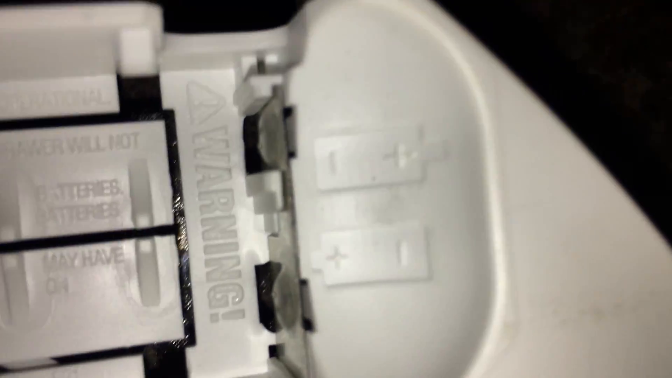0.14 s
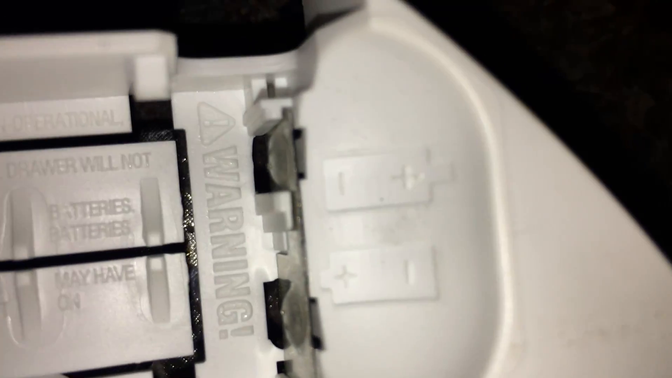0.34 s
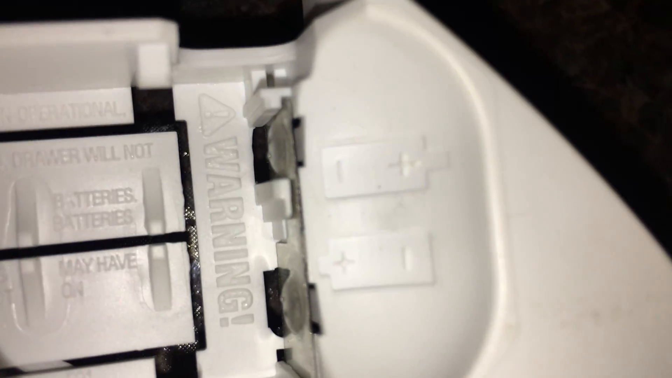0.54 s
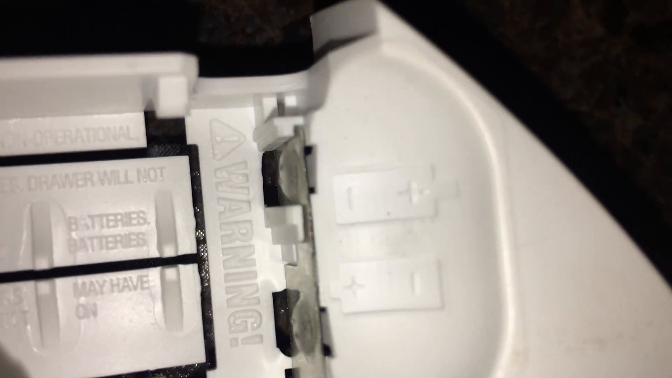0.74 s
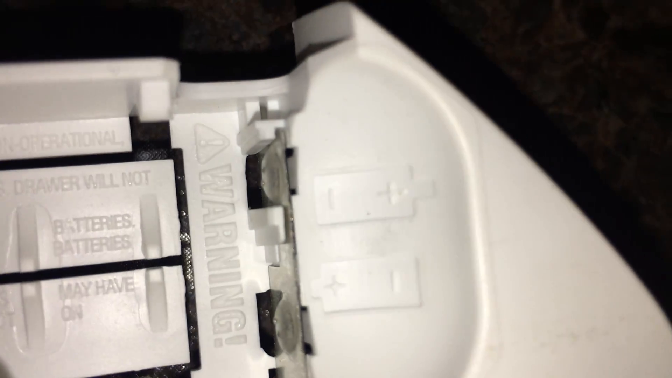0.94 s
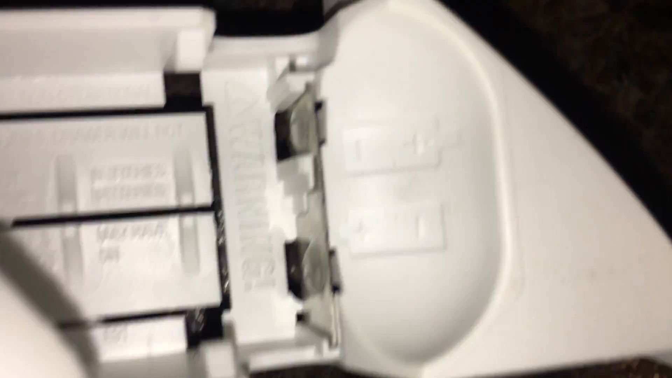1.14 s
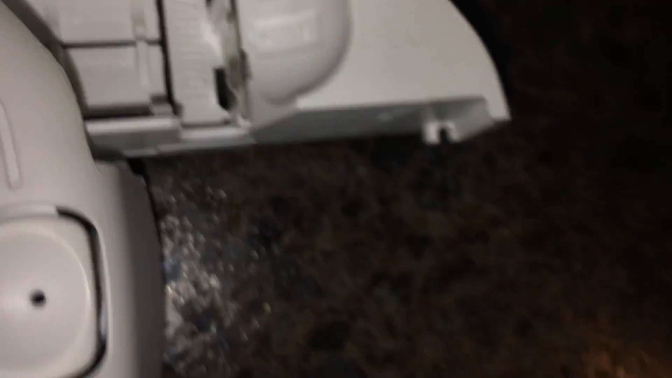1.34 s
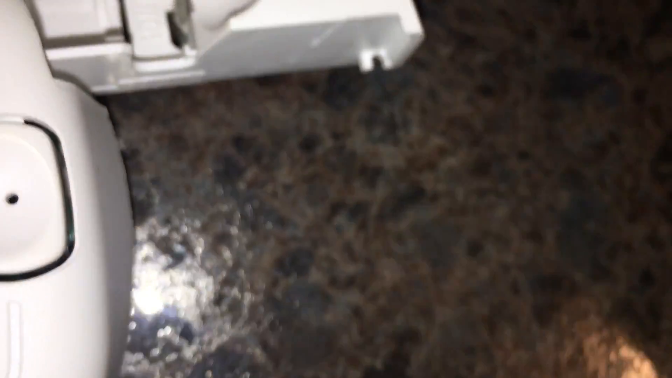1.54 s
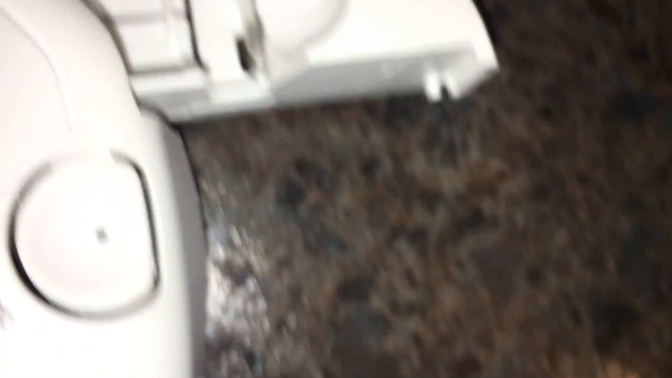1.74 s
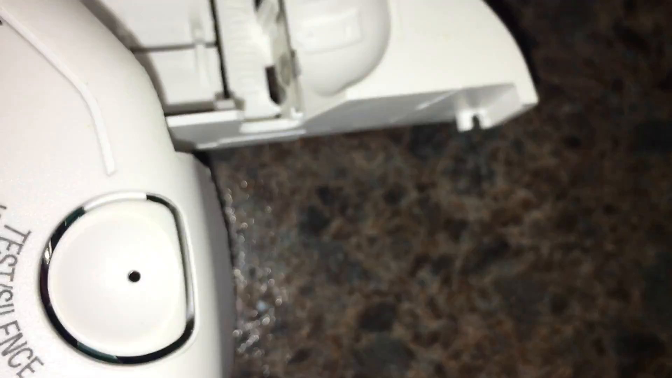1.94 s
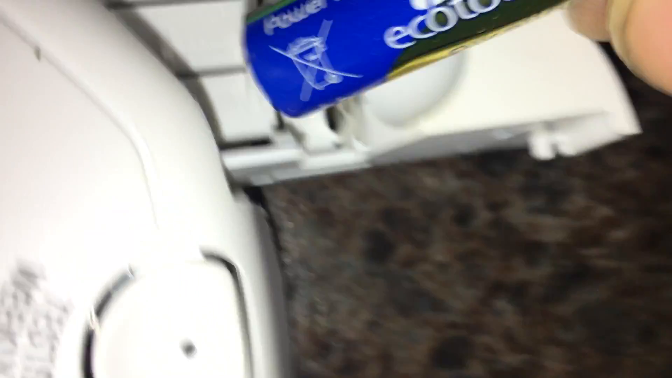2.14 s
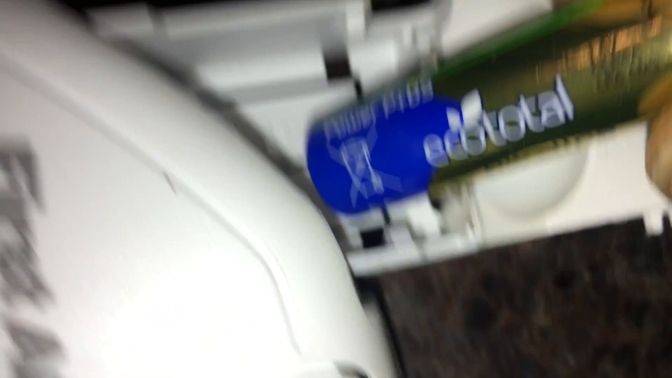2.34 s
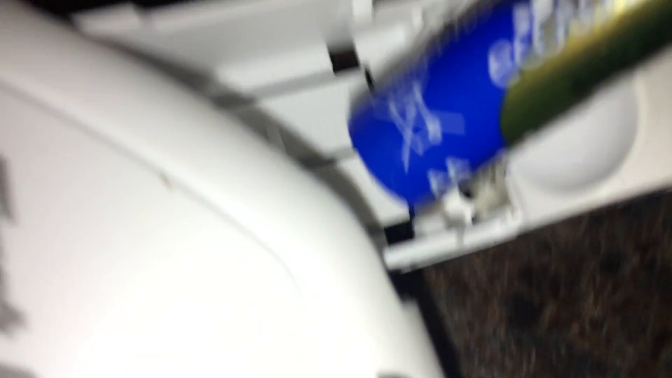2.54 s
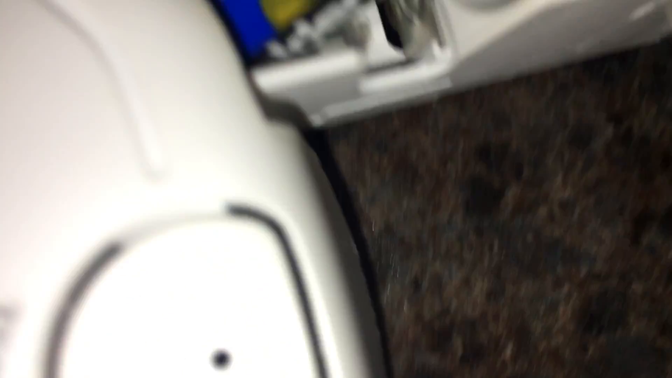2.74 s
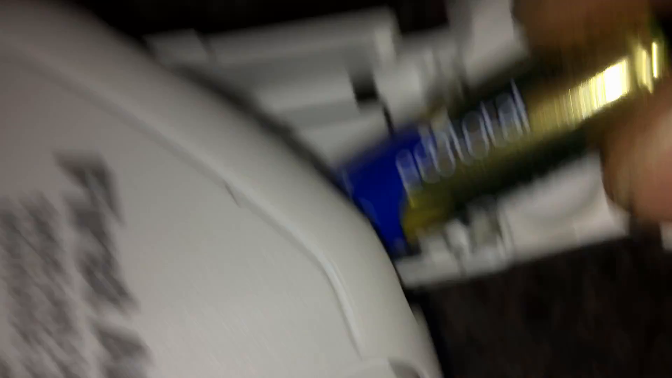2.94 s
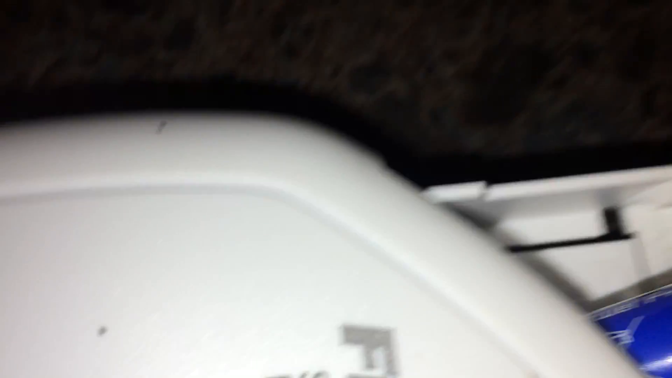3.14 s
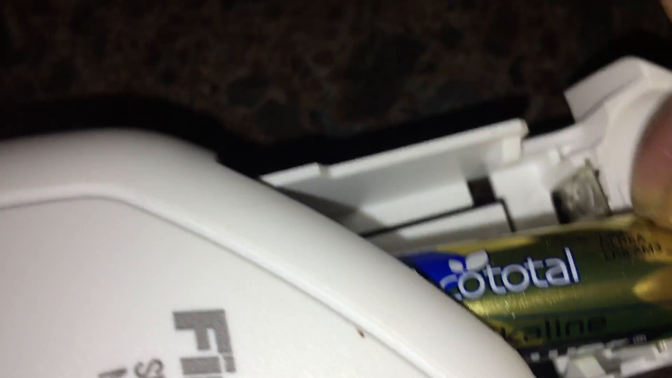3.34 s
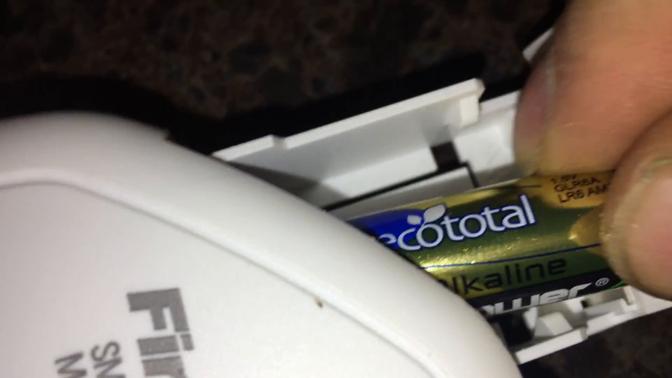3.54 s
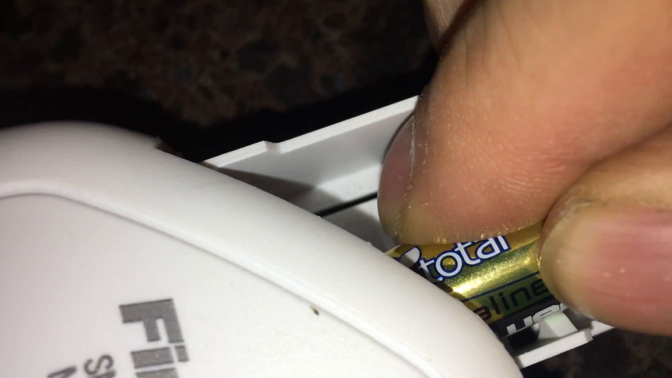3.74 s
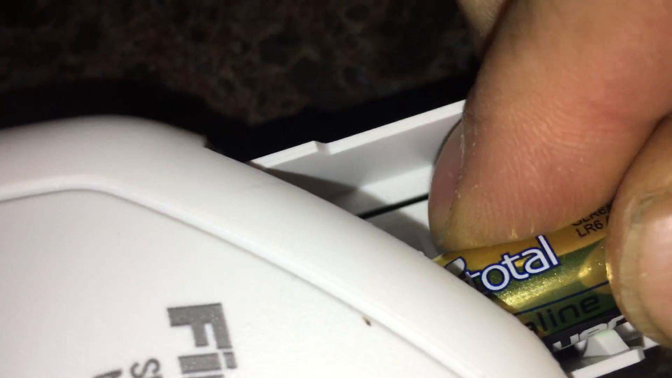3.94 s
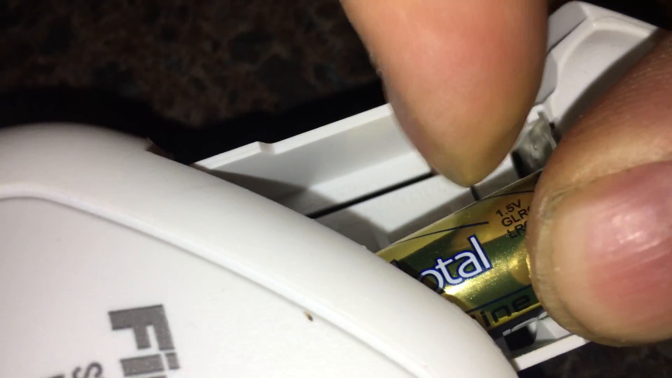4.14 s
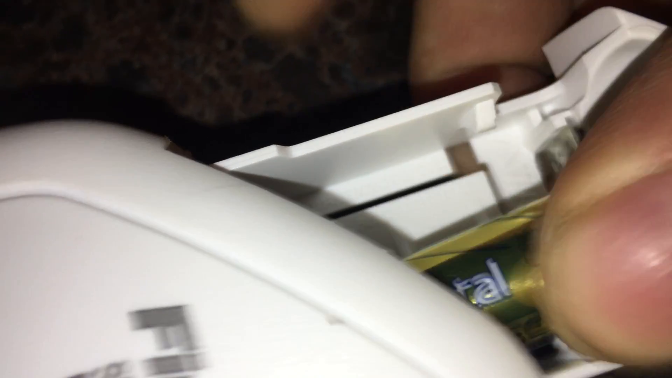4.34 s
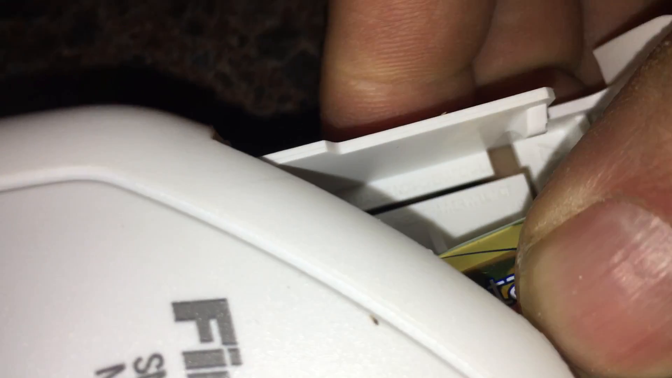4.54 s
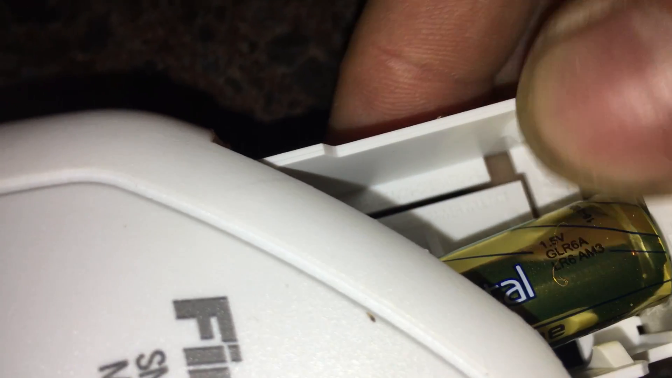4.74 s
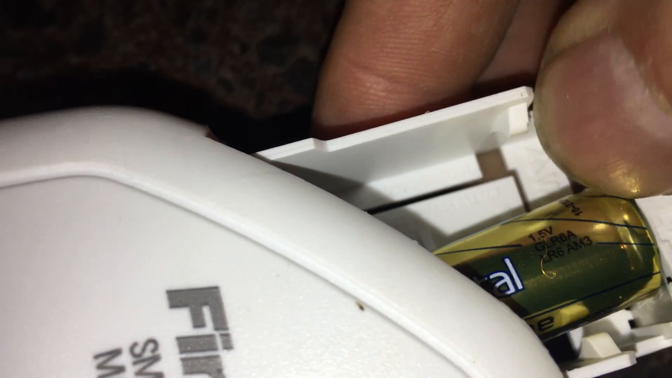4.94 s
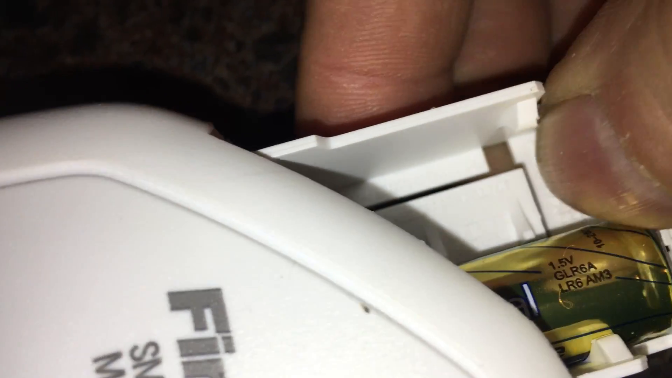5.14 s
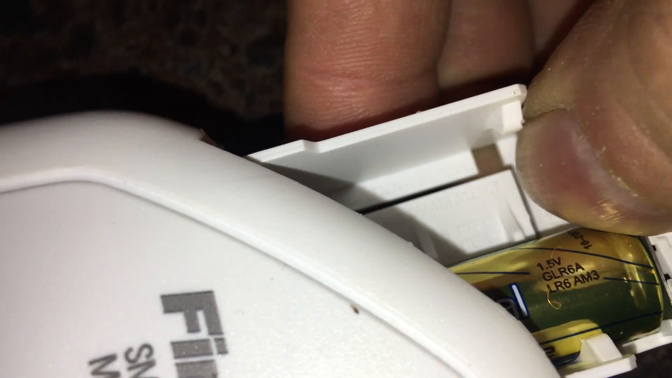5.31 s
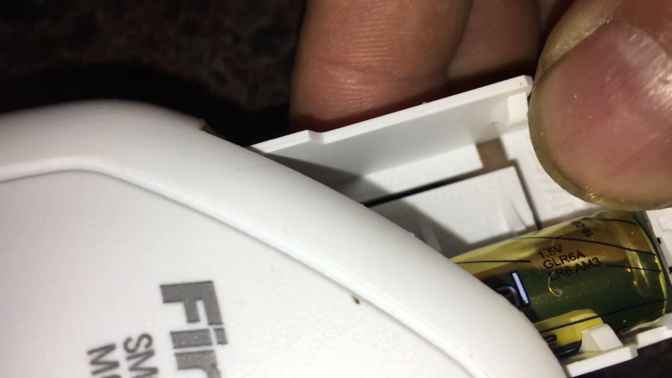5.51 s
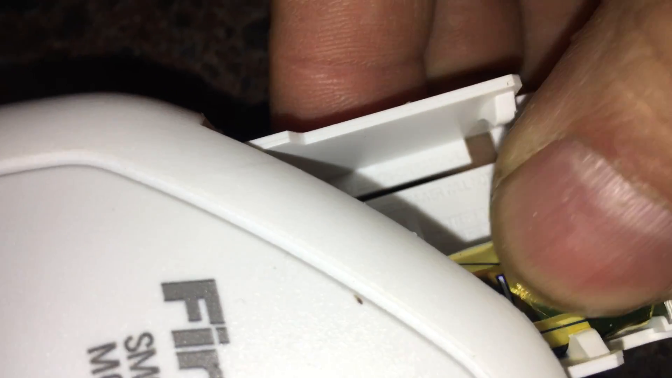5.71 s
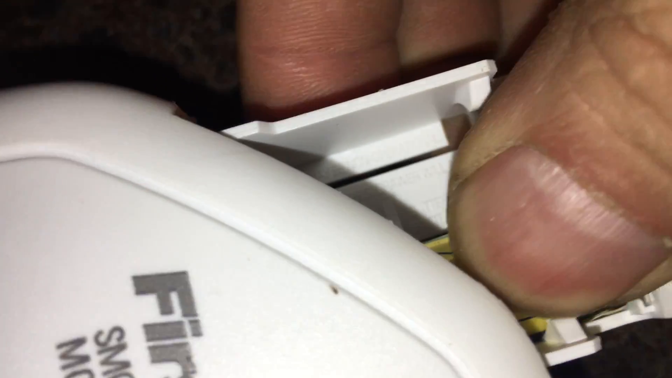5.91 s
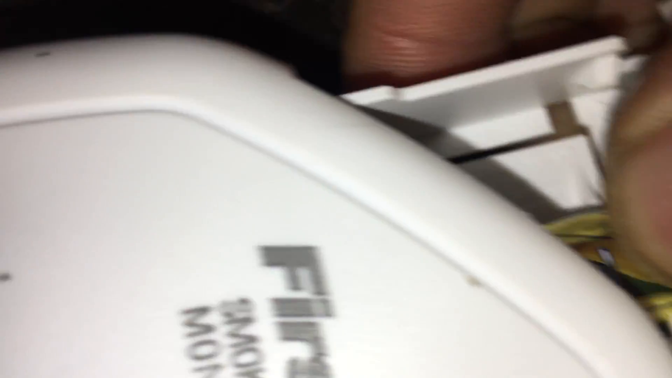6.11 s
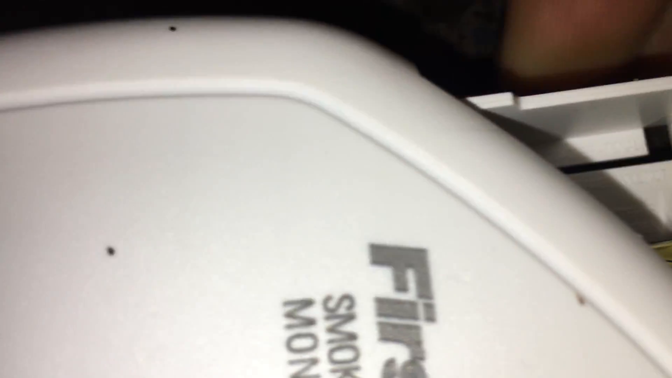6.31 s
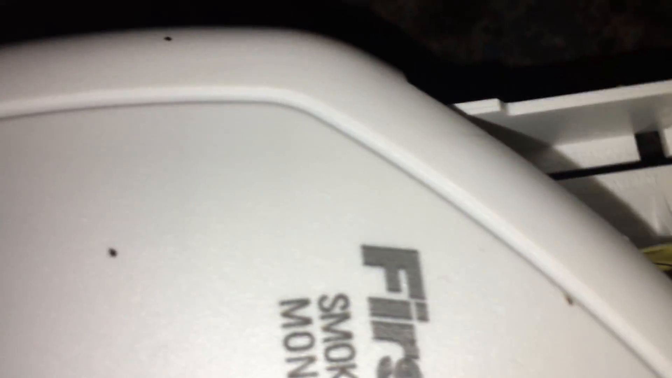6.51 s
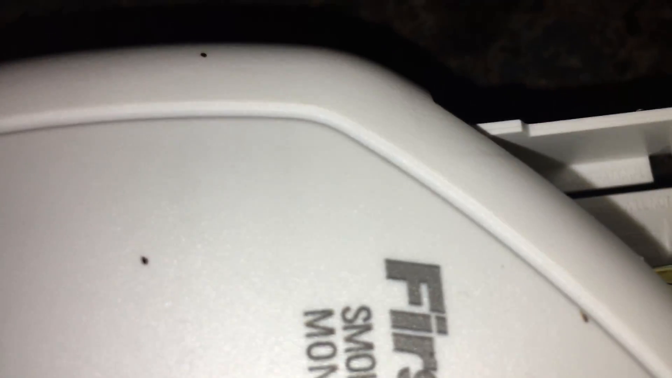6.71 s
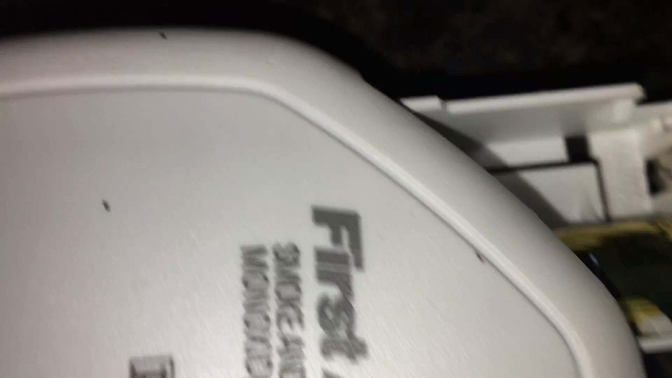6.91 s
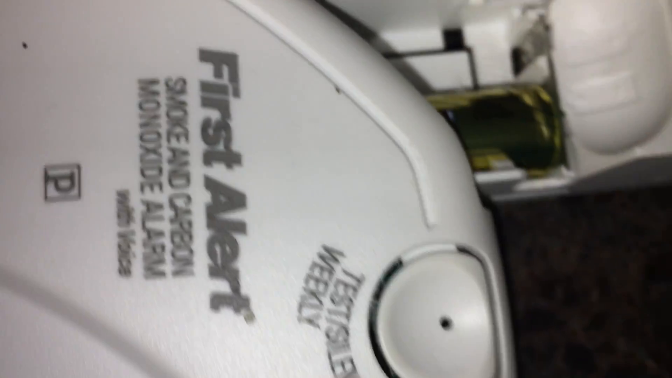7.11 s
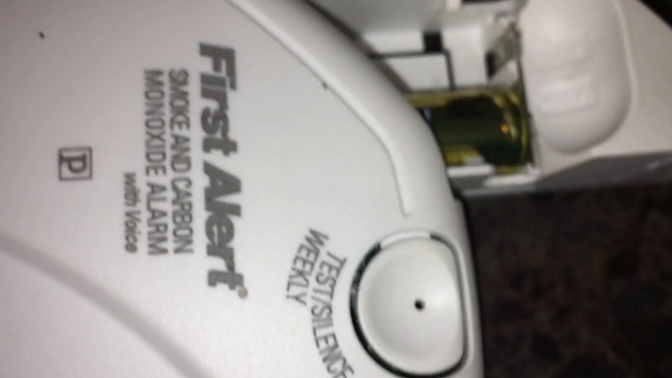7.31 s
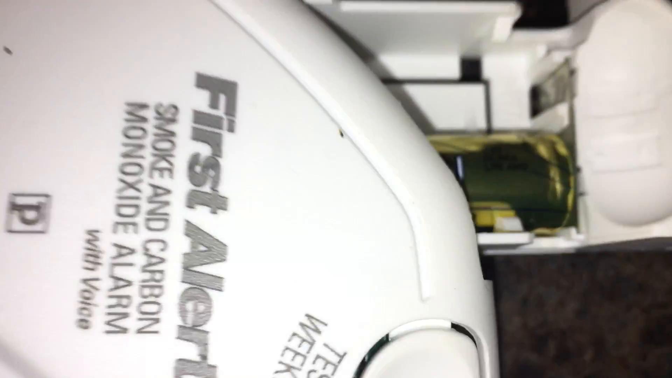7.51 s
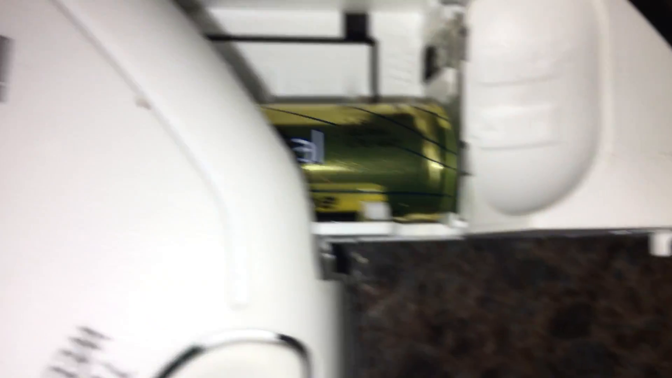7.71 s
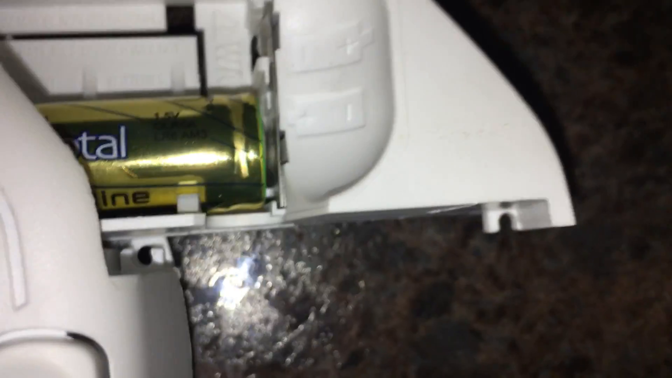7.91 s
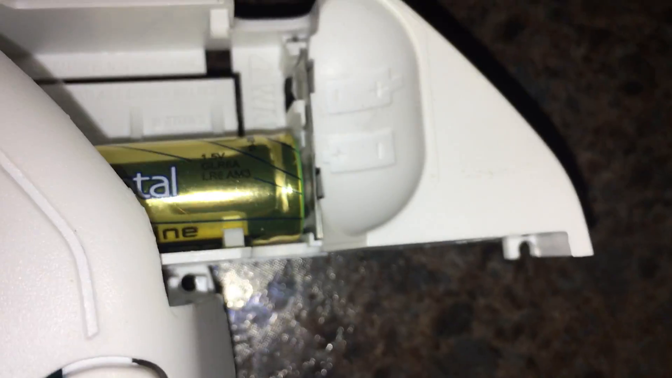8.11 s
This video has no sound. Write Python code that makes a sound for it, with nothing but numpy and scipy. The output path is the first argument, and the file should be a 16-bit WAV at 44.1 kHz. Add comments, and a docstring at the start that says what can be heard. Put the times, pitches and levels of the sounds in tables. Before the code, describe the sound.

Thin hard plastic is handled on a stone counter. After near silence come faint bumps, then dry taps and gritty short scrapes as a metal battery is worked into place. Loud snaps cluster in the middle, each a crack and clatter with a tiny rebound. Fingers rub lightly afterwards; quiet returns before a last tap. Close microphone, short room reflections, low background rumble.

```python
"""A battery is worked into the plastic drawer of an alarm on a stone counter, over a faint low room rumble.
First a hand bumps the case and a nail ticks: struck modes plus noise bursts. From 2 s the battery taps
and is drawn along the plastic: stick-slip pulses and noise filtered by the panels.
Between 3 and 5.5 s it snaps five times past the spring: paired strikes of release and landing, repeated on
rebound. Scraping thins out towards 7 s; then come soft bumps, ticks and a last tap."""
import sys
import numpy as np
from scipy import signal
from scipy.fft import rfft, irfft, next_fast_len
from scipy.io import wavfile
from scipy.ndimage import map_coordinates

SR = 44100
rng = np.random.default_rng(int(sys.argv[2]) if len(sys.argv) > 2 else 0)


def file_out(sig):
    """Save sig as 16-bit WAV at sys.argv[1]."""
    # one column per channel
    cols = np.atleast_2d(sig).T
    # limit, then scale
    lim = np.clip(cols, -1, 1)
    pcm = np.round(lim * 32767).astype(np.int16)
    wavfile.write(sys.argv[1], SR, pcm)


N = 364266
HIT_T_S = np.arange(SR // 7) / SR  # time axis of one strike

# All table levels are relative; the functions using them add their own gains.
# modes of case and drawer panels: f/Hz, level/dB, t60/s
PANELS = [(616, -7.5, .04), (667, -12.5, 0.072), (903, 0.5, 0.058), (1092, -7.5, 0.076), (1222, -1, 0.036),
          (1312, 0.5, 0.051), (1624, -4, 0.095), (1786, -0.5, 0.025), (1980, 0.5, 0.035), (2222, -7, 0.055),
          (2494, 2.5, 0.031), (2790, -18.5, .035), (3175, 0.5, 0.072), (3378, 3, 0.025),
          (3670, -1.5, 0.068), (4125, -10, 0.012)]
# battery snaps past the spring: t/s, case/dB, low knock/dB, sharp edge/dB, favoured ring f/Hz,
# landing delay/s, rebound delay/s, rebound level/dB, run-up friction/dB
SNAPS = [(3.2174, -8.5, -20, -23, 1078, 0.00082, 0.0094, -6, -40),
         (3.4047, -12.5, -26, -26, 1313, 0.00081, 0.011, -11.5, -28),
         (3.7175, -8, -29, -14.5, 1215, 0.0035, 0.011, -7.5, -15.5),
         (4.425, -7, -21.5, -11.5, 1220, .0035, 0.015, -3.5, -41.5),
         (5.1868, -12, -29.5, -15, 898, .001, .007, -10, -26.5)]
# hand bumps the unit: t/s, low knock/dB, case/dB
BUMPS = [(1.066, -41, -38.5), (1.088, -36, -45.5), (1.126, -42.5, -50), (1.16, -39, -40),
         (6.926, -41, -48.5), (7.005, -45, -54), (7.115, -50, -55)]


def amp(db):
    """Decibels to gain."""
    return 10 ** (np.asarray(db) / 20)


def unit(x):
    """Scale to rms 1."""
    return x / np.sqrt(np.mean(x ** 2) + 1e-20)


def along(points, hz):
    """(Hz, value) points interpolated on a log frequency axis."""
    f, v = np.transpose(points)
    return np.interp(np.log(hz + 1), np.log(f + 1), v)


def filtered(x, response):
    """Apply a frequency response, zero-padded against wrap-around."""
    m = next_fast_len(len(x) + SR // 4)
    spectrum = rfft(x, m) * response(np.fft.rfftfreq(m, 1 / SR))
    return irfft(spectrum, m)[:len(x)]


def coloured(x, spectrum):
    """x shaped by (Hz, dB) points, at rms 1."""
    return unit(filtered(x, lambda hz: amp(along(spectrum, hz))))


def wobble(rate):
    """Smooth random curve, rate knots per second."""
    knots = rng.standard_normal(int(N * rate / SR) + 4)
    return map_coordinates(knots, [np.arange(N) * rate / SR])


def shifting(x, depth_db, band_hz, rate):
    """Colour drifts in bands band_hz wide, rate knots per second; in friction, as the touching spot moves."""
    hz, t, z = signal.stft(x, SR, nperseg=512)
    knots = rng.standard_normal((256, 256))
    position = np.meshgrid(hz / band_hz, t * rate, indexing="ij")
    field = map_coordinates(knots, position, mode="wrap")
    return signal.istft(z * amp(depth_db * field), SR, nperseg=512)[1][:N]


def add(out, s, sound):
    """Mix a sound in at time s, cut at the end of out."""
    part = out[round(s * SR):][:len(sound)]
    part += sound[:len(part)]


def air():
    """Room rumble with a trace of hiss: coloured noise, gently drifting in level and colour."""
    # room background spectrum: f/Hz, level/dB
    air_colour = [(12, -48), (20, -12), (86, 1.5), (172, -10.5), (193, -15), (234, -10), (388, -20.5),
                  (1090, -25), (1220, -27.5), (2080, -27), (2910, -33), (12800, -38.5), (16000, -44.5)]
    noise = shifting(rng.standard_normal(N), depth_db=1.0, band_hz=210, rate=4.7)
    level_db = -63 + 0.37 * wobble(1.1)
    return amp(level_db) * coloured(noise, air_colour)


def room_tail():
    """Nearby walls answer with noise that builds over milliseconds and decays by band, lows longest."""
    # room decay: f/Hz, t60/s
    decay = [(100, 0.4), (700, 0.29), (1150, 0.31), (1700, 0.23), (4000, 0.17), (16000, 0.25)]
    hz, t, z = signal.stft(rng.standard_normal(SR // 3), SR, nperseg=256)
    t60_s = along(decay, hz)[:, None]
    tail = signal.istft(z * np.exp(-np.log(1000) * t / t60_s), SR, nperseg=256)[1]
    build_s = 0.005
    tail = tail * (1 - np.exp(-np.arange(len(tail)) / SR / build_s))
    return tail / np.linalg.norm(tail)


def room(x, count=48):
    """The unit moves in the hands, so each stretch of sound meets new reflections."""
    out = np.zeros(N + SR)
    for stretch in np.array_split(np.arange(N), count):
        echo = signal.fftconvolve(x[stretch], room_tail())
        out[stretch[0]:][:len(echo)] += echo
    return out[:N]


def slips(rate, spread_db, smooth):
    """Stick-slip pulses, rate per second and uneven in size, over smooth friction noise."""
    chance, size, grain, noise = rng.random(N), *rng.standard_normal((3, N))
    pulse_gain = amp(spread_db * np.clip(size, -2, 2))
    pulses = (chance < rate / SR) * np.sign(grain) * pulse_gain
    return unit(pulses) + smooth * noise


def through_panels(x, width_hz, direct):
    """Friction drives the panel resonances, damped by the gripping hand to one common width."""
    def response(f):
        total = direct
        for hz, db, _ in PANELS:
            total = total + amp(db) * 1j * f * width_hz / (hz * hz - f * f + 1j * f * width_hz)
        return total
    return filtered(x, response)


def voiced(x, hardness_db, favoured_hz):
    """The spot struck favours nearby modes; a padded touch (negative hardness) wakes mostly lower ones."""
    def response(hz):
        spot_db = 6 * np.exp(-(np.log((hz + 1) / favoured_hz) / 0.16) ** 2)
        tilt_db = along([(1300, 0), (3500, hardness_db)], hz)
        return amp(spot_db + tilt_db)
    return unit(filtered(x, response))


def grip():
    """Even a resting hand makes the plastic tick very faintly: sparse slips ring the panels."""
    ticking = through_panels(slips(rate=14, spread_db=4, smooth=0), width_hz=130, direct=0)
    return amp(-84.5) * voiced(ticking, hardness_db=-16, favoured_hz=900)


def stroke_levels():
    """Scrape, hiss and shudder in dB: the strongest stroke leads; scraping and bumps shake the unit."""
    # battery or finger drawn along the plastic: start t/s, length/s, scrape/dB, fine hiss/dB
    strokes = [(1.057, 0.022, -58.5, -61.5), (1.093, 0.074, -62.5, -80), (1.169, 0.11, -66.5, -61),
               (2.128, 0.094, -62.5, -69), (2.262, 0.048, -53.5, -59), (2.54, 0.059, -43, -63),
               (2.618, 0.078, -51.5, -55.5), (2.682, .13, -44, -53), (2.93, 0.38, -58, -63),
               (3.28, 0.083, -42.5, -52.5), (3.362, 0.062, -35.5, -52.5), (3.411, .13, -55.5, -64),
               (3.623, 0.083, -57, -59.5), (3.731, 0.049, -49.5, -53), (3.83, 0.29, -59.5, -72),
               (4.073, 0.16, -46.5, -58), (4.266, 0.076, -49, -47.5), (4.369, 0.17, -51, -61),
               (4.688, 0.2, -55, -57.5), (4.941, .035, -36, -46), (4.982, 0.069, -55.5, -67),
               (5.149, 0.097, -47.5, -68.5), (5.413, 0.035, -51, -57.5), (5.57, .19, -57, -60.5),
               (5.752, 0.17, -56, -64.5), (5.962, 0.17, -54.5, -66), (6.106, 0.18, -51, -56.5),
               (6.307, 0.034, -44.5, -48), (6.839, 0.12, -57, -67)]
    attack_share, release_s = 0.27, 0.017  # attack as a share of stroke length
    held_from_s, held_to_s, held_fade_s = 2.5, 6.85, 0.074
    held_scrape_db, held_hiss_db = -68.5, -79.5  # holding hand never rests entirely
    t = np.arange(N) / SR
    held = np.exp(-np.abs(t - np.clip(t, held_from_s, held_to_s)) / held_fade_s)
    scrape, hiss = amp(held_scrape_db) * held, amp(held_hiss_db) * held
    for start_s, length_s, scrape_db, hiss_db in strokes:
        done = np.clip((t - start_s) / length_s, 0, 1)
        release = np.exp(-np.clip(t - start_s - length_s, 0, 1) / release_s)
        shape = np.minimum(done / attack_share, 1) * release
        scrape = np.maximum(scrape, amp(scrape_db) * shape)
        hiss = np.maximum(hiss, amp(hiss_db) * shape)

    # -55.5 dB of shudder at -47.5 dB of scrape, 0.55 dB more per dB
    shudder = amp(-55.5 + 0.55 * (20 * np.log10(scrape) + 47.5))
    sway_db, sway_s = -8.5, 0.047  # shudder around a bump, relative to its knock
    for s, knock_db, _ in BUMPS:
        sway = amp(knock_db + sway_db) * np.exp(-np.abs(t - s) / sway_s)
        shudder = np.maximum(shudder, sway)

    run_up_s, run_up_hiss_db = 0.0036, -5  # friction swells into each snap and dies after it
    for s, *_, run_up_db in SNAPS:
        grind = amp(run_up_db) * np.exp(-np.minimum(np.abs(t - s), 1) / run_up_s)
        scrape = np.maximum(scrape, grind)
        hiss = np.maximum(hiss, amp(run_up_hiss_db) * grind)
    return 20 * np.log10([scrape, hiss, shudder])


def sliding():
    """Rough slips scrape in the panels, skin hisses on the plastic, the unit shudders."""
    # friction spectra: f/Hz, level/dB
    scrape_colour = [(200, -28), (500, -4.5), (880, 0), (1400, -1), (2200, -9.5), (3500, -5), (4400, -14.5),
                     (7000, -42)]
    hiss_colour = [(2000, -31), (4400, 0), (7000, -1.5), (9300, -4.5), (10500, -9), (16000, -12.5)]
    skin_colour = [(2000, -29.5), (4500, -3), (7000, -7), (10500, -6), (12500, -2), (16000, -4.5)]
    shudder_colour = [(20, -27.5), (55, -0.5), (160, -2.5), (260, 0.5), (480, -20), (1200, -43.5)]
    scrape_db, hiss_db, shudder_db = stroke_levels()
    pressure_db = 2.6 * wobble(50)
    grit = wobble(240)  # slips clump over a few milliseconds
    catches = slips(rate=81, spread_db=1.5, smooth=0)  # rough edges catch many times a second

    rough = slips(rate=720, spread_db=1.5, smooth=1.0) * amp(2.0 * grit) + 0.22 * catches
    rough = through_panels(rough, width_hz=95, direct=2.4)
    rough = shifting(rough, depth_db=3.0, band_hz=260, rate=11)
    fine = slips(rate=2500, spread_db=7, smooth=1.2) * amp(0.55 * grit) + 0.3 * catches
    fine = shifting(fine, depth_db=2.8, band_hz=330, rate=9)

    # a fingertip hisses higher and scrapes less than metal
    skin_share = np.clip((hiss_db - scrape_db + 3.0) / 9, 0, 1)
    friction = (1 - skin_share) * coloured(fine, hiss_colour) + skin_share * coloured(fine, skin_colour)
    scrape = amp(scrape_db + pressure_db - 1.0) * coloured(rough, scrape_colour)
    hiss = amp(hiss_db + 0.5 * pressure_db) * friction
    rumble = coloured(rng.standard_normal(N), shudder_colour)
    shudder = amp(shudder_db + pressure_db - 1.5) * rumble
    return scrape + hiss + shudder


def fade(t60, attack):
    """Envelope of a struck thing: quick rise (time constant attack, s), exponential fall."""
    return np.exp(-np.log(1000) * HIT_T_S / t60) * (1 - np.exp(-HIT_T_S / attack))


def ring(modes, attack, scatter_db, detune):
    """Decaying modes of starting power 1; each touch and grip weights and tunes them anew."""
    hz, db, t60 = np.transpose(modes)[:, :, None]
    weight, pitch = rng.standard_normal((2, len(hz), 1))
    gain = amp(db + scatter_db * weight)
    tuned_hz = hz * (1 + detune * pitch)
    phase = 2 * np.pi * (tuned_hz * HIT_T_S + rng.random(hz.shape))
    total = np.sum(gain * np.sin(phase) * fade(t60, attack), axis=0)
    return total * np.sqrt(2 / np.sum(gain ** 2))


def burst(spectrum, t60, attack):
    """Countless overlapping modes, heard as dying noise."""
    return coloured(rng.standard_normal(len(HIT_T_S)), spectrum) * fade(t60, attack)


def strike(case_db, knock_db, edge_db, ring_hz):
    """One contact cracks, rings the plastic and the metal, and rocks the unit."""
    # whole unit rocking on the counter: f/Hz, level/dB, t60/s
    rocking_modes = [(66.5, -11.5, 0.19), (95, -2, 0.081), (127, -4, 0.045), (168.2, -1, 0.065),
                     (234, 0.5, 0.076), (323, -2, 0.05), (405.8, -4.5, 0.052)]
    # high ring of battery can and steel contact: f/Hz, level/dB, t60/s
    metal_modes = [(4420, 2.5, 0.026), (5560, -3.5, 0.047), (6270, -5.5, 0.042), (7056, -1.5, 0.041),
                   (8710, -2.5, 0.03), (9080, -4, 0.036), (11700, -13, 0.018)]
    # noise spectra of case clatter and sharp crack: f/Hz, level/dB
    clatter_colour = [(200, -23), (480, -4.5), (1000, 2), (1700, -5), (2400, -7.5), (3700, -5), (4400, -10),
                      (6500, -38.5)]
    edge_colour = [(2000, -28), (4000, 5), (4600, 0.5), (6400, 4.5), (7800, -2), (9000, -1), (10500, -5),
                   (16500, -11.5)]
    hardness_db = np.clip(0.5 * (edge_db - case_db + 11), -14, 4)
    panels = ring(PANELS, attack=0.0015, scatter_db=5.5, detune=0.029)
    clatter = amp(0.5) * burst(clatter_colour, t60=0.055, attack=0.00032)
    case = amp(-19.0) * voiced(panels + clatter, hardness_db, ring_hz)
    metal = amp(-8.5) * ring(metal_modes, attack=0.00016, scatter_db=0.5, detune=0.012)
    crack = amp(1.5) * burst(edge_colour, t60=0.021, attack=0.0004)
    knock = amp(2.5) * ring(rocking_modes, attack=0.0016, scatter_db=0.5, detune=0.07)
    return amp(case_db) * case + amp(edge_db) * (metal + crack) + amp(knock_db) * knock


def bumps():
    """Padded bumps of the hand: low knock and case with hardly any edge."""
    out = np.zeros(N)
    for s, knock_db, case_db in BUMPS:
        add(out, s, strike(case_db, knock_db, edge_db=case_db - 32, ring_hz=765))
    return out


def nail_ticks():
    """Thin ticks of a fingernail on a rim: case and knock follow the edge level."""
    # ticks: t/s, sharp edge/dB
    tick_table = [(1.65, -67), (3.972, -47.5), (4.603, -53), (4.644, -53.5), (5.535, -55.5), (6.714, -50),
                  (7.03, -65), (7.814, -69)]
    out = np.zeros(N)
    for s, edge_db in tick_table:
        add(out, s, strike(edge_db + 2.5, edge_db - 4.5, edge_db, ring_hz=3400))
    return out


def taps():
    """The battery taps the drawer and bounces once, softer and duller."""
    # taps: t/s, case/dB, low knock/dB, sharp edge/dB, favoured ring f/Hz
    tap_table = [(2.141, -26, -45, -36, 1240), (2.266, -31.5, -32.5, -42.5, 1215),
                 (2.305, -26.5, -49, -47, 1160), (2.322, -24, -34.5, -47.5, 1309),
                 (2.541, -20, -37.5, -27.5, 1344), (2.645, -22.5, -42.5, -39.5, 980),
                 (2.669, -28.5, -49, -50.5, 1870), (2.737, -27.5, -40.5, -40, 897),
                 (2.796, -35, -33, -50.5, 1167), (2.839, -28.5, -33.5, -43, 1026),
                 (2.88, -32, -45, -59.5, 950), (3.191, -24.5, -37, -43, 1360),
                 (3.253, -27.5, -57, -44, 875), (3.668, -29.5, -36, -47, 872),
                 (3.75, -26, -44, -42.5, 1132), (4.202, -26, -37, -33.5, 947),
                 (4.67, -38, -46.5, -57.5, 710), (4.727, -39, -44, -52.5, 1125),
                 (4.916, -37.5, -43.5, -53, 895), (4.969, -27, -37.5, -36.5, 800),
                 (5.075, -24.5, -47, -37, 966), (5.145, -37.5, -54, -58, 1480),
                 (5.313, -33, -42.5, -60.5, 980), (5.339, -34, -39.5, -60.5, 933),
                 (5.3757, -32.5, -41, -75, 956), (5.444, -34.5, -53, -41.5, 885),
                 (5.584, -39, -49, -51, 930), (6.27, -39, -52, -51, 880), (6.317, -39, -54, -44.5, 1600),
                 (6.644, -48, -53.5, -77, 1347), (6.694, -49, -59, -74, 1410),
                 (8.18, -27.5, -37, -41, 1085)]
    bounce_s, bounce_db, bounce_edge_db = 0.027, -13.5, -24
    out = np.zeros(N)
    for s, case_db, knock_db, edge_db, ring_hz in tap_table:
        add(out, s, strike(case_db, knock_db, edge_db, ring_hz))
        bounce = strike(case_db + bounce_db, knock_db + bounce_db, edge_db + bounce_edge_db, ring_hz)
        add(out, s + bounce_s, bounce)
    return out


def snaps():
    """The spring lets go with a crack and the battery lands in the case; both repeat as it rebounds."""
    release_case_db, landing_edge_db = -6, -5  # release favours edge, landing favours case
    out = np.zeros(N)
    for s, case_db, knock_db, edge_db, ring_hz, landing_s, rebound_s, rebound_db, _ in SNAPS:
        for start_s, db in [(s, 0), (s + rebound_s, rebound_db)]:
            release = strike(case_db + release_case_db, knock_db + release_case_db, edge_db, ring_hz)
            landing = strike(case_db, knock_db, edge_db + landing_edge_db, ring_hz)
            add(out, start_s, amp(db) * release)
            add(out, start_s + landing_s, amp(db) * landing)
    return out


def scene():
    """The handled unit, its room reflections and the background."""
    handling = grip() + sliding() + bumps() + nail_ticks() + taps() + snaps()
    return (air() + amp(-22) * room(handling) + handling)[None]


def record(dry):
    """The microphone rounds the loudest peaks, sheds the deepest bass and stops at its band limit."""
    ceiling, corner_hz, top_hz = 0.8, 24, 16200
    rounded = dry[0] / (1 + (dry[0] / ceiling) ** 4) ** (1 / 4)

    def response(hz):
        low_cut = 1j * hz / (1j * hz + corner_hz)
        return low_cut ** 2 * (hz < top_hz)
    return filtered(rounded, response)[None]


dry = scene()
out = record(dry)
file_out(out)
```